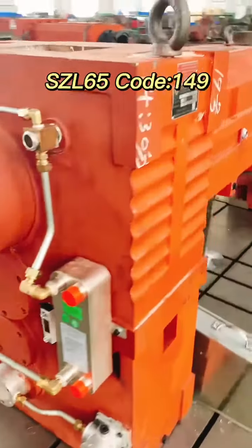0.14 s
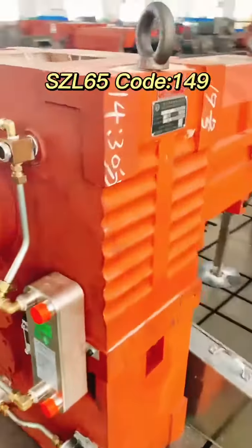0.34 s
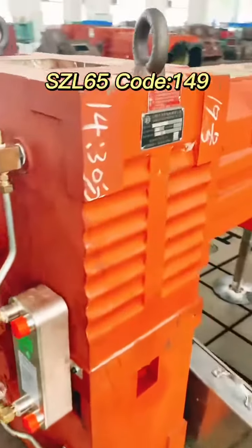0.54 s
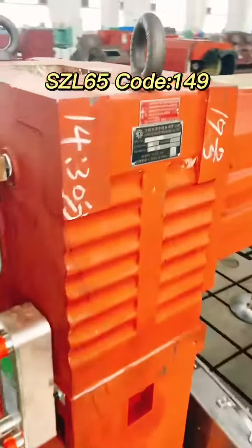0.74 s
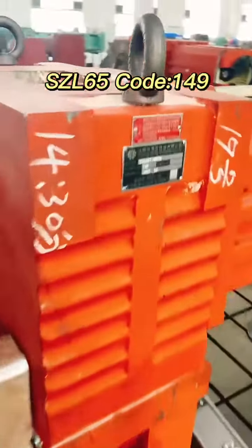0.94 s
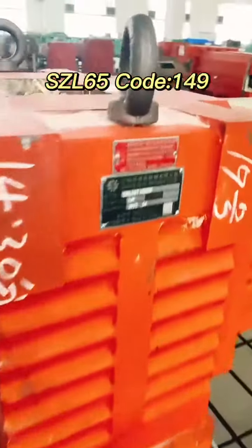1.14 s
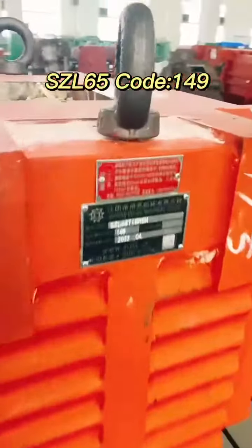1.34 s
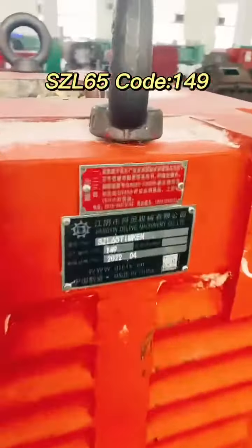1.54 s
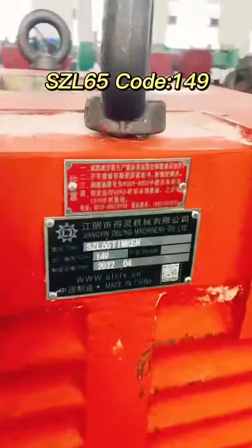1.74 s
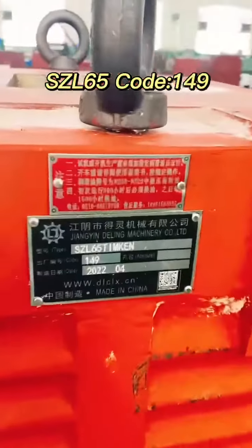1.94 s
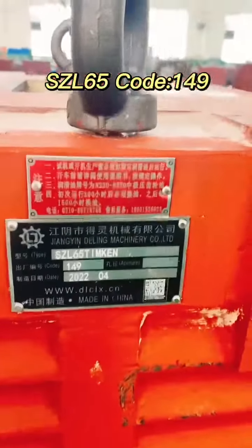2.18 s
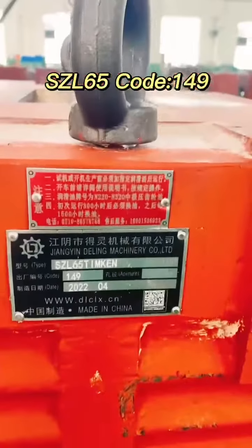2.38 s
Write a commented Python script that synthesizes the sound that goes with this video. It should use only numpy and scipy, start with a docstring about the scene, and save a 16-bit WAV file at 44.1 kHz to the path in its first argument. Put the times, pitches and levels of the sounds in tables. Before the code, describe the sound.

A gearbox runs throughout in a large factory hall: low uneven rumble, broad dull roar with hollow housing resonances, and a thin wavering whine near 6 kHz. Faint whistles and thin bands of hiss come and go. Distant clanks fall at 0.3, 1.1 and 1.3 s; metal squeals roughly from 1.1 to 1.7 s; two short metallic pings sound at about 2.4 s. Mono, limited treble.

```python
"""A gearbox runs on a test stand in a large factory hall. From the start one hears its low rumble, a broad roar
with housing resonances, the thin whine of the motor drive and faint whistles; thin bands of noise come and go
at the limits of the broad sound. Shaped noise makes the roar, sines the whine. From 0.3 s a few far parts clank
as decaying noise; from 1.1 s metal squeals for half a second in rough partials and hiss; from 2.37 s two short
decaying sines ping."""
import sys
import numpy as np
from scipy import signal
from scipy.fft import rfft, irfft, next_fast_len
from scipy.io import wavfile
from scipy.ndimage import uniform_filter1d, map_coordinates

SR = 44100
rng = np.random.default_rng(int(sys.argv[2]) if len(sys.argv) > 2 else 0)


def wav_record(signal):
    """Record a signal, one row per channel, as 16-bit PCM in the file named by sys.argv[1]."""
    frames = np.transpose(np.atleast_2d(signal))
    bounded = np.clip(frames, -1, 1)
    # unit amplitude maps onto the largest positive 16-bit level
    quanta = np.round(bounded * 32767).astype(np.int16)
    wavfile.write(sys.argv[1], SR, quanta)


def gain_from_db(level_db):
    """Convert decibel levels to linear amplitude factors (20 dB per decade)."""
    decades = np.asarray(level_db, float) / 20
    return 10 ** decades


N = 110691  # samples


def unit(x):
    """Normalisation: a signal divided by its effective value has rms 1."""
    return x / np.sqrt(np.mean(x ** 2) + 1e-20)


def along(points, hz):
    """Spectral envelope: (Hz, value) points joined by straight lines on a log frequency axis."""
    point_hz, value = np.transpose(points)
    return np.interp(np.log(hz + 1), np.log(point_hz + 1), value)


def curves(rows, outside=None):
    """Temporal envelope: one value per sample for each column after the time."""
    seconds, *columns = np.transpose(rows)
    return [np.interp(np.arange(N) / SR, seconds, c, outside, outside) for c in columns]


def wobble(rate):
    """Slow random modulation: a smooth curve through random knots, rate of them a second (60 at most)."""
    knots = rng.standard_normal(int(N * 60 / SR) + 9)
    return map_coordinates(knots, [np.arange(N) * min(rate, 60) / SR])


def filtered(x, response):
    """Linear filtering: the spectrum is multiplied by a response of frequency."""
    size = next_fast_len(N + SR // 2)
    return irfft(rfft(x, size) * response(np.fft.rfftfreq(size, 1 / SR)), size)[..., :N]


def rush(spectrum, patchy_db):
    """Broadband random noise: shaped to a spectrum, rms 1, with narrow streaks of random gain."""
    grains = signal.stft(rng.standard_normal(N), nperseg=1024)[2]
    across_hz = uniform_filter1d(rng.standard_normal(grains.shape), size=3, axis=0)
    field = uniform_filter1d(across_hz, size=7, axis=1)  # then along time
    patchy = signal.istft(grains * gain_from_db(patchy_db * unit(field)), nperseg=1024)[1][:N]
    return unit(filtered(patchy, lambda hz: gain_from_db(along(spectrum, hz))))


def resonance(centre_hz, width_hz):
    """Resonance: noise in a narrow peak, its gain a quarter at half a width from the centre; rms 1."""
    response = lambda hz: 1 / (1 + (2 * (hz - centre_hz) / width_hz) ** 2) ** 2
    return unit(filtered(rng.standard_normal(N), response))


def ringing(peaks):
    """Superposition of modes: noise resonances added, each at its own rms level."""
    return sum(gain_from_db(db) * resonance(hz, width) for hz, width, db in peaks)


def tone(hz, db):
    """Periodic excitation: a machine's sine, slightly unsteady in level and phase."""
    phase = 2 * np.pi * hz * np.arange(N) / SR + 1.1 * wobble(8)
    return np.sqrt(2) * gain_from_db(db + 2.2 * wobble(5)) * np.sin(phase)


# Rumble spectrum. Each row: frequency in Hz, relative density in dB per Hz.
RUMBLE_SPECTRUM = [(13, -65), (22, -37), (32, -18.5), (75, 0), (91, 1.5), (124, -8), (140, -15), (180, -37),
                   (310, -120)]
# Rumble level, hum included. Each row: time in seconds, rms level in dB.
RUMBLE_LEVEL = [(0.0, -38), (0.55, -35), (0.63, -29), (1.38, -31), (1.44, -24), (1.66, -24), (1.71, -33),
                (1.81, -33), (1.85, -27), (2.35, -31), (2.51, -36)]
# Shaft hum. One row: frequency in Hz, mean level in dB relative to the rumble noise.
SHAFT_HUM = (82, -3)


def rumble():
    """Low-frequency vibration: band noise and a shaft hum share one varying level."""
    level_db, = curves(RUMBLE_LEVEL)
    return gain_from_db(level_db) * unit(rush(RUMBLE_SPECTRUM, patchy_db=-2.5) + tone(*SHAFT_HUM))


# Levels of the roar. Each row: time in seconds, then dB of low roar, roar, mids, upper mids and treble,
# the last two before UPPER_DB and TREBLE_DB are added.
ROAR_LEVELS = [(0.0, -22.5, -32, -29.5, -43, -53.5), (0.03, -25, -26.5, -30.5, -45.5, -60),
               (0.25, -27, -26, -27.5, -38.5, -55), (0.325, -24, -25, -28, -40, -55),
               (0.55, -22, -24, -27, -39.5, -57.5), (0.9, -21.5, -24.5, -30, -40.5, -53.5),
               (1.1, -22.5, -24.5, -30, -43.5, -57.5), (1.12, -23, -23.5, -27, -38, -59),
               (1.25, -21.5, -25, -25.5, -38, -53), (1.36, -22, -21, -26, -36, -52),
               (1.64, -20, -21.5, -25.5, -41, -56.5), (1.72, -22.5, -25, -27.5, -40, -59),
               (2.29, -24, -27.5, -31, -45.5, -60), (2.38, -25.5, -26.5, -30.5, -45.5, -54.5),
               (2.51, -21, -27, -31, -44.5, -59)]
# Spectra of the five bands, low to high. Each row: frequency in Hz, relative density in dB per Hz.
LOW_ROAR = [(71, -33), (120, -2), (291, 0.5), (318, -1), (480, -6), (620, -43), (1060, -120)]
ROAR = [(250, -28), (430, 0), (565, 1), (706, 1.5), (885, -4.5), (1040, -3), (1300, -14.5), (1690, -20.5),
        (2860, -120)]
MIDS = [(680, -30), (1150, 1.5), (1490, -2), (1700, 2), (1850, -0.5), (2410, -5.5), (2800, -13.5),
        (3640, -40), (6160, -120)]
UPPER = [(1650, -32), (2800, -3), (4630, -9), (5580, -10.5), (5910, -6), (6190, -17.5), (6300, -8.5),
         (8190, -42), (13900, -120)]
TREBLE = [(4850, -60), (8250, -14), (8590, -8.5), (9050, -7.5), (10900, -5), (11800, -3), (12400, -4),
          (12800, -23), (16700, -40), (22000, -120)]
UPPER_DB, TREBLE_DB = 3.5, 2.5  # dB, each whole band over its lower part
# Housing resonances in the low roar and in the roar.
# Each row: frequency in Hz, width in Hz, level in dB relative to that band's noise.
LOW_HOUSING = [(366.2, 11.4, -11)]
MID_HOUSING = [(620, 20, -15), (700, 40, -14), (790, 15, -17), (1013, 80, -13)]
# Gear tones. Each row: frequency in Hz, mean level in dB relative to the low roar's noise.
GEAR_TONES = [(155, -11), (325, -9.5)]


def roar():
    """Structure-borne radiation: five noise bands, the lower two with resonances, the lowest with gear tones."""
    low_db, roar_db, mids_db, upper_db, treble_db = curves(ROAR_LEVELS)
    gears = sum(tone(hz, db) for hz, db in GEAR_TONES)
    low = unit(rush(LOW_ROAR, patchy_db=0.8) + ringing(LOW_HOUSING) + gears)
    middle = unit(rush(ROAR, patchy_db=1.0) + ringing(MID_HOUSING))
    mids = gain_from_db(mids_db) * rush(MIDS, patchy_db=2.0)
    upper = gain_from_db(upper_db + UPPER_DB) * rush(UPPER, patchy_db=3.0)
    treble = gain_from_db(treble_db + TREBLE_DB) * rush(TREBLE, patchy_db=4.0)
    return gain_from_db(low_db) * low + gain_from_db(roar_db) * middle + mids + upper + treble


CARRIER_HZ, SWEEP_HZ = 5966.1, 71.35  # the drive's switching tone and its sweep rate
WAVER_DB, WAVER_RAD = 1.2, 0.6  # the hall makes each line waver


def line(hz, db):
    """Interference: one spectral line that the hall makes waver in level and phase."""
    t = np.arange(N) / SR
    level = np.sqrt(2) * gain_from_db(db + WAVER_DB * wobble(3.7))
    return level * np.sin(2 * np.pi * (hz * t + rng.random()) + WAVER_RAD * wobble(5.04))


def comb(lowest_hz, levels_db):
    """Modulation sidebands: spectral lines spaced one sweep rate apart."""
    return sum(line(lowest_hz + k * SWEEP_HZ, db) for k, db in enumerate(levels_db))


# Five strongest lines. Each row: time in seconds, then mean dB of the lines from 2 below the carrier to 2 above;
# they shift as the listener walks.
STRONG_LINES = [(0.0, -57.3, -56.7, -47.3, -47.7, -56.6), (0.25, -51.8, -49.9, -47.6, -49.5, -53.8),
                (0.5, -51.3, -57.9, -53.9, -43.2, -56.2), (0.75, -52.6, -51.5, -50.2, -49.7, -55.0),
                (1.0, -58.8, -46.4, -44.9, -47.0, -52.1), (1.25, -55.9, -49.5, -49.5, -47.2, -50.8),
                (1.51, -51.1, -50.4, -47.5, -46.5, -55.9), (1.76, -56.1, -52.3, -42.8, -46.0, -50.7),
                (2.01, -58.7, -47.9, -43.2, -42.7, -50.7), (2.26, -58.2, -47.9, -48.4, -47.8, -48.7),
                (2.51, -57.4, -49.8, -48.1, -45.1, -49.3)]
# Weaker lines. Each entry: mean level in dB, from 6 to 3 below the carrier, then 3 to 7 above.
WEAK_LINES_DB = [-56, -63, -64, -61, -62, -65, -72, -67, -64]


def whine():
    """Periodic frequency modulation: the drive's swept switching tone is a carrier among sidebands."""
    lines_db = [*WEAK_LINES_DB[:4], *curves(STRONG_LINES), *WEAK_LINES_DB[4:]]
    return comb(CARRIER_HZ - 6 * SWEEP_HZ, lines_db)


# Octave lines. Each entry: level in dB before the common level, from 6 below twice the carrier up.
OCTAVE_LINES_DB = [-70, -72, -70, -72, -65, -70, -62, -64, -69, -70, -68]
# Common level of the octave. Each row: time in seconds, gain in dB.
OCTAVE_LEVEL = [(0, -5), (.6, -4), (.8, 0), (1.5, 1), (2.51, 1)]


def whine_octave():
    """Second harmonic: sidebands at the same spacing surround twice the carrier."""
    level_db, = curves(OCTAVE_LEVEL)
    return gain_from_db(level_db) * comb(2 * CARRIER_HZ - 6 * SWEEP_HZ, OCTAVE_LINES_DB)


# Hums and faint whistles of other machines.
# Each row: start in seconds, end in seconds, frequency in Hz, width in Hz, level in dB.
WHISTLES = [(-.1, .35, 1756, 15, -36), (.65, 1.6, 1756, 30, -41), (1.7, 2.3, 1809, 40, -43),
            (.7, 1.1, 4865, 45, -49), (.75, 1.17, 6800, 30, -62), (.35, .52, 285, 50, -29),
            (.35, .5, 455, 70, -29), (2.4, 2.6, 5495, 15, -49)]


def whistles():
    """Narrow-band resonance: noisy tones fade in before each start and out after each end."""
    t = np.arange(N) / SR
    total = np.zeros(N)
    for start, end, hz, width, db in WHISTLES:
        gate = np.clip(np.minimum(t - start, end - t) / 0.07 + 1, 0, 1)  # 70 ms ramps
        total += gate * ringing([(hz, width, db)])
    return total


# Thin bands at the limits of the broad sound, made by no machine or part.
# Each row: low edge in Hz, high edge in Hz, level in dB when fully on, random knots a second.
EDGE_BANDS = [(6330, 6500, -56, 14), (6500, 6600, -62, 18), (6600, 6720, -69, 12), (12420, 12640, -69, 16),
              (12720, 12840, -76, 18)]


def band_edges():
    """Random gating: thin noise bands at the limits of the broad sound come and go, apart from any source."""
    total = np.zeros(N)
    for low, high, db, rate in EDGE_BANDS:
        gate = np.clip(2 * wobble(rate) + 0.3, 0, 1)
        band = unit(filtered(rng.standard_normal(N), lambda hz: (hz > low) & (hz < high)))
        total += gain_from_db(db) * gate * band
    return total


def decay(start, db, t60, rise):
    """Exponential decay: after a soft start of time constant rise, the level falls 60 dB in t60 seconds."""
    t = np.arange(N) / SR - start
    return gain_from_db(db - 60 * np.abs(t) / t60) * (1 - np.exp(-np.clip(t, 0, None) / rise))


# Distant clanks. Each row: start in seconds, level in dB before the soft start, t60 in seconds.
CLANKS = [(.305, -33, .3), (1.11, -32, .25), (1.315, -33, .3)]
# Clank spectrum. Each row: frequency in Hz, relative density in dB per Hz.
CLANK_SPECTRUM = [(300, -120), (800, -4), (3000, -5), (6000, -10), (9500, -17), (12500, -22), (14000, -120)]


def clanks():
    """Impact excitation: far blows are decaying bursts of patchy noise."""
    envelope = sum(decay(start, db, t60, rise=0.0028) for start, db, t60 in CLANKS)
    return envelope * rush(CLANK_SPECTRUM, patchy_db=6.5)


# Squeal levels. Each row: time in seconds, then dB of the lower partial, the upper partial and the top partials.
SQUEAL_LEVEL = [(1.09, -50, -48, -46), (1.125, -35, -35, -35), (1.18, -31, -29, -39), (1.21, -30, -35, -36),
                (1.28, -31, -31, -32), (1.355, -29, -37, -36), (1.41, -35, -34, -38), (1.46, -37, -35, -39),
                (1.535, -33, -30, -39), (1.575, -36, -41, -39), (1.65, -39, -34, -39),
                (1.69, -42, -46, -47), (1.85, -46, -47, -54)]
# The two loud partials. Each entry: frequency in Hz.
SQUEAL_HZ = (2472, 2964)
# Top partials. Each row: frequency in Hz, width in Hz, relative level in dB.
SQUEAL_TOP = [(4416, 55, -1), (4620, 90, 0), (4800, 90, -4)]
# Scraping hiss. Each row: frequency in Hz, relative density in dB per Hz.
SQUEAL_HISS = [(1180, -42), (2000, -11), (2280, 5), (3040, -1.5), (3250, -6.5), (4530, -5), (5600, -31),
               (7280, -64), (12300, -120)]


def squeal():
    """Friction vibration: far metal squeals in rough, stuttering partials with a scraping hiss."""
    *partials_db, top_db = curves(SQUEAL_LEVEL, outside=-120)
    t = np.arange(N) / SR
    partials = np.zeros(N)
    for hz, db in zip(SQUEAL_HZ, partials_db):
        rough = gain_from_db(4 * wobble(40)) * np.sin(2 * np.pi * hz * t + 1.1 * wobble(40))
        partials += gain_from_db(db) * unit(rough)
    hiss = gain_from_db(5) * rush(SQUEAL_HISS, patchy_db=3.5)  # 5 dB over the top partials
    return partials + gain_from_db(top_db) * (unit(ringing(SQUEAL_TOP)) + hiss)


# Short pings of far metal.
# Each row: start in seconds, frequency in Hz, peak level in dB before the soft start, t60 in seconds.
PINGS = [(2.365, 3450, -38, .3), (2.46, 1900, -28, .3)]


def pings():
    """Free vibration: far metal pings as decaying sines."""
    t = np.arange(N) / SR
    return sum(decay(start, db, t60, rise=0.0045) * np.sin(2 * np.pi * hz * t) for start, hz, db, t60 in PINGS)


# Limits of the broad sound. Entries in Hz: where it stops, resumes and stops again.
BROAD_LIMITS_HZ = (6330, 8200, 12420)


def scene():
    """Linear superposition: all sources add in one channel, the broad ones and pings through two pass bands."""
    stop, resume, top = BROAD_LIMITS_HZ
    passed = lambda hz: (hz < stop) | ((hz > resume) & (hz < top))
    broad = filtered(rumble() + roar() + clanks() + squeal() + pings(), passed)
    return (broad + whine() + whine_octave() + whistles() + band_edges())[None]


def top_cut(x):
    """Nothing passes above the cut-off."""
    return signal.sosfilt(signal.butter(12, 13000, fs=SR, output="sos"), x)


def record(dry):
    """Direct pickup: the mix is taken as it stands, with no added room or noise."""
    return top_cut(dry)


dry = scene()
out = record(dry)
wav_record(out)
```